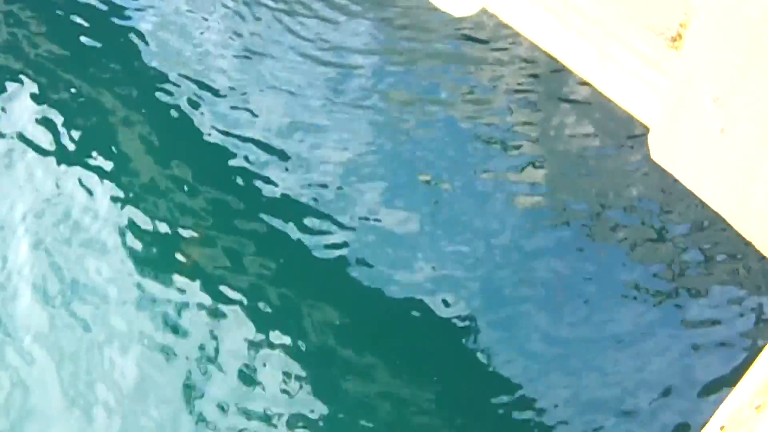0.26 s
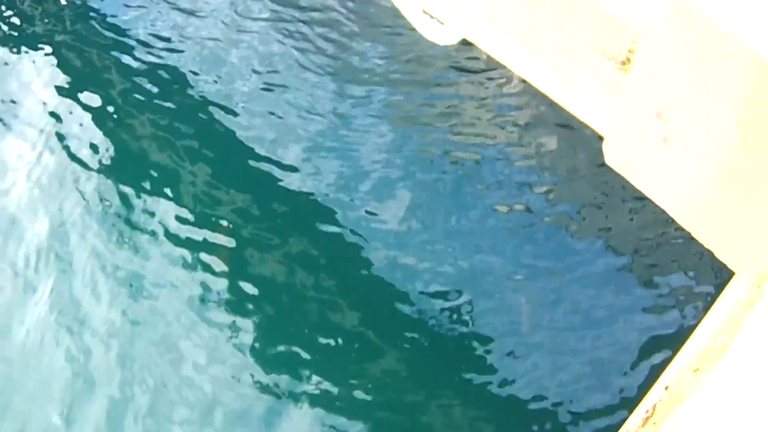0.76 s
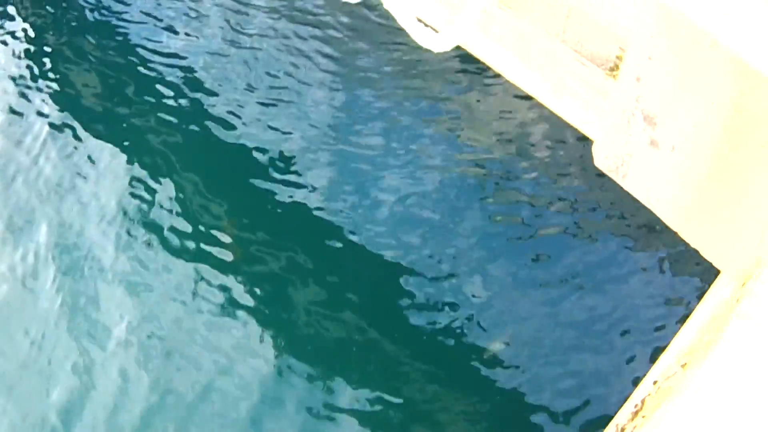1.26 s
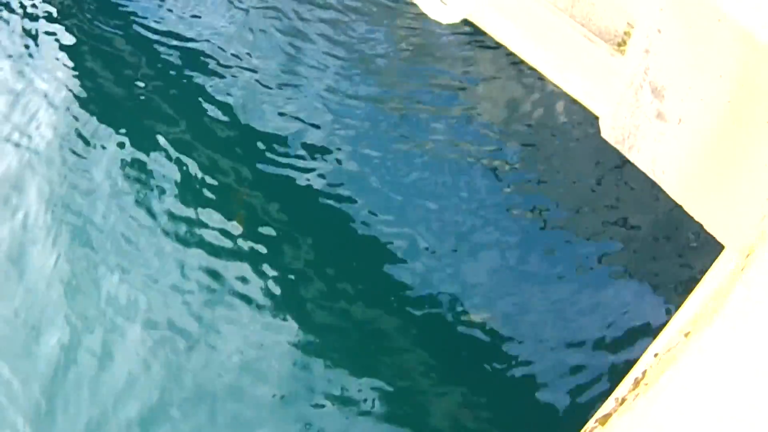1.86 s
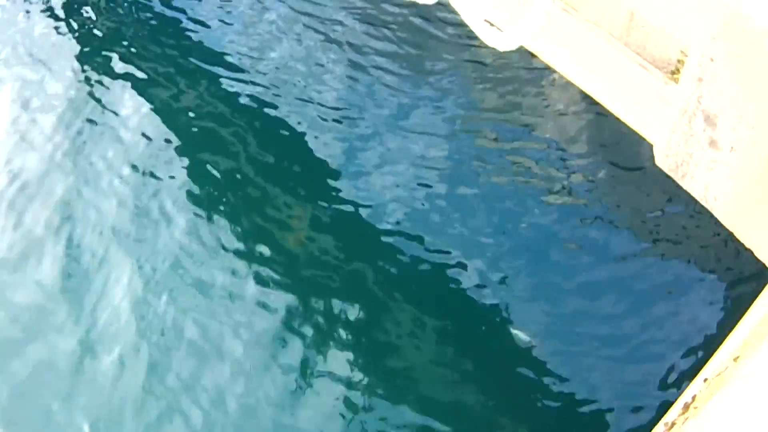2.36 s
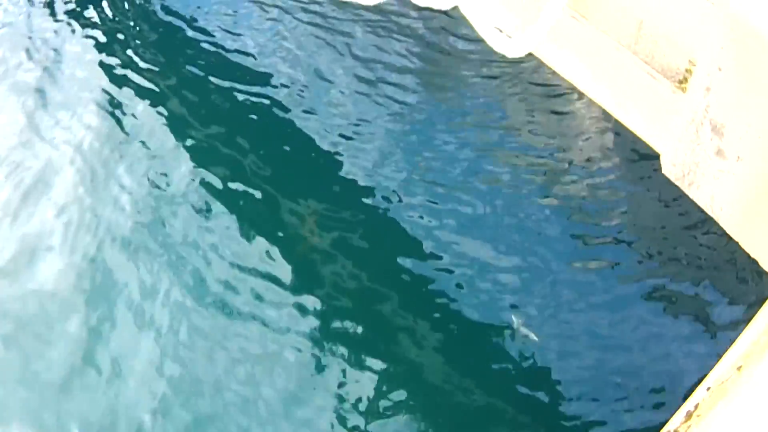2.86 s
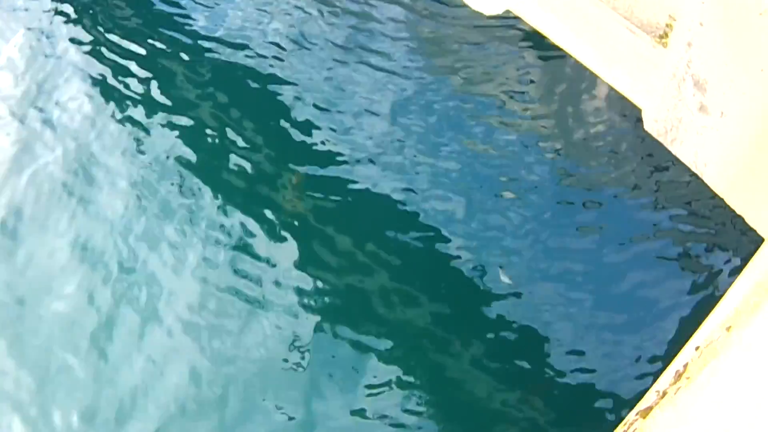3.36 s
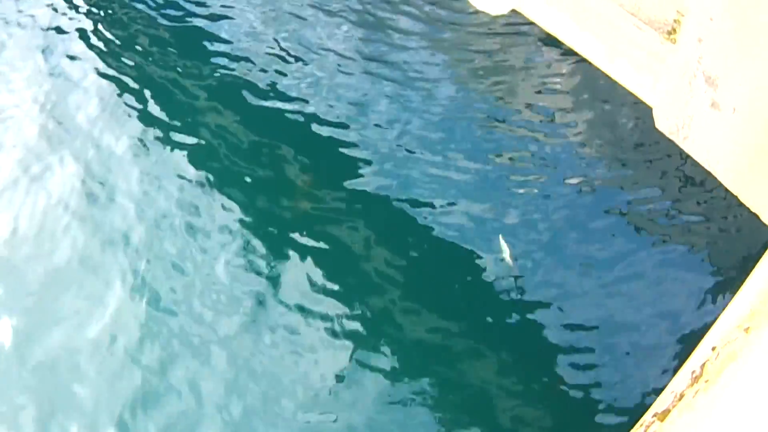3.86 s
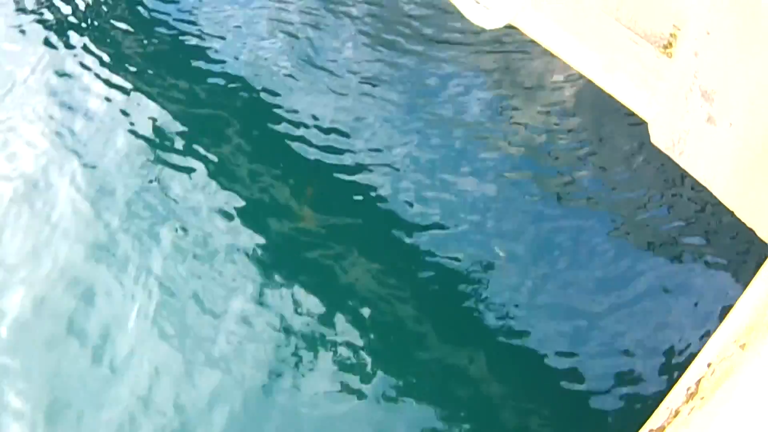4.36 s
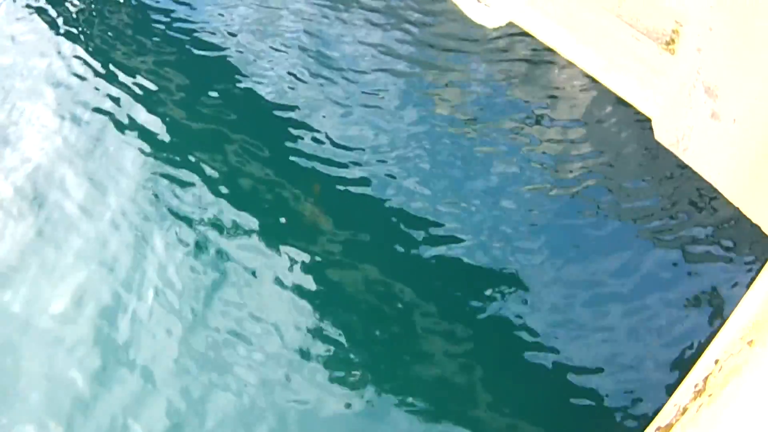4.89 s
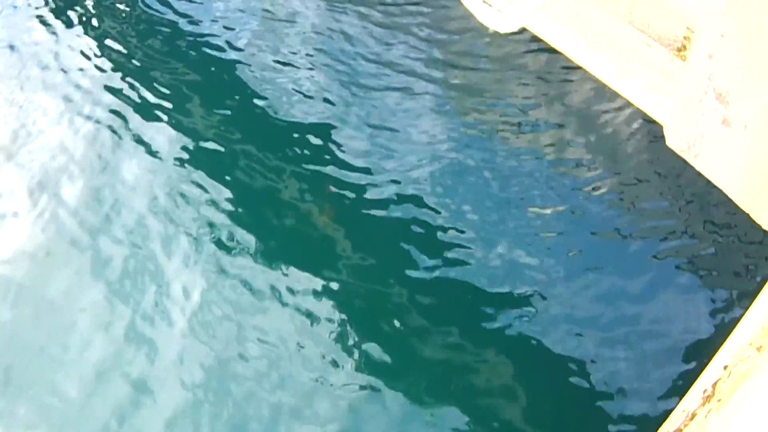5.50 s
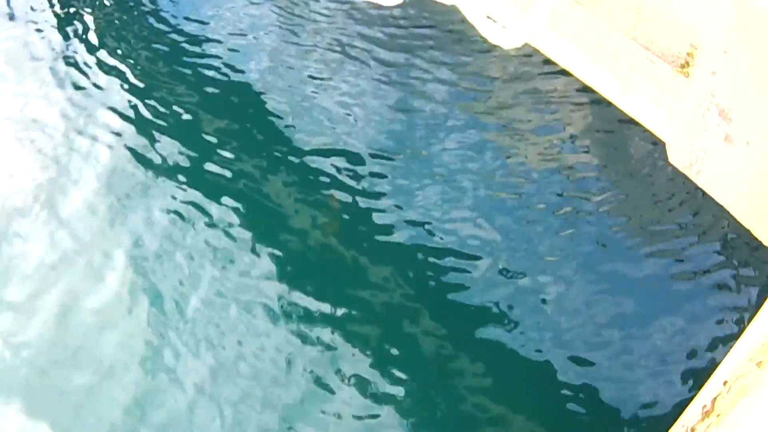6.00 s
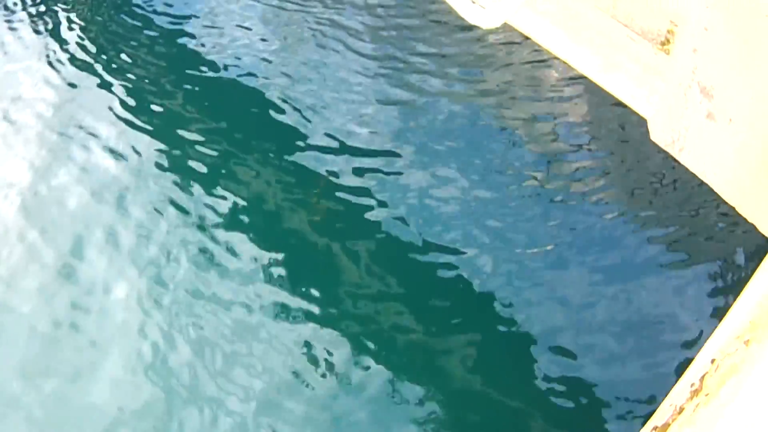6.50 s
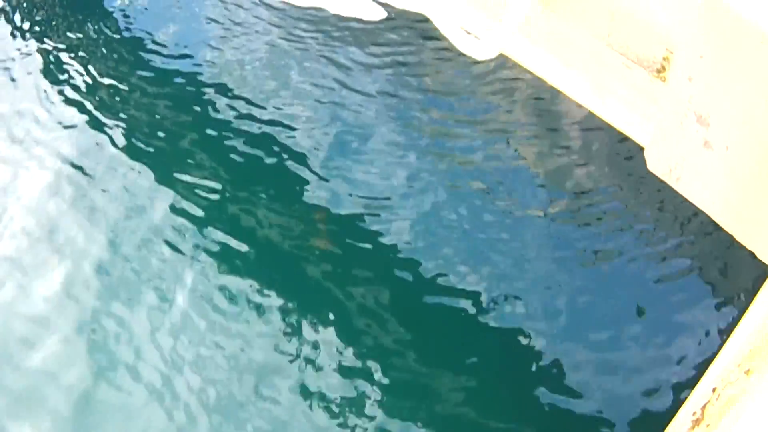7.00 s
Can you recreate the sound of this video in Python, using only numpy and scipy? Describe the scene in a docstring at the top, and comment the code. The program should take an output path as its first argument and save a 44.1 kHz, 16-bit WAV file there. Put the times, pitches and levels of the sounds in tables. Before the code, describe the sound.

A moored boat's diesel engine idles throughout with a low throbbing rumble and light machinery clatter. Over it, water spray hisses steadily, a little to the left, and ripples lap softly against a harbour pier. Small drips plink and a few dry ticks sound, the sharpest about two seconds in. Foam fizzes faintly near the end. The microphone is on the pier, close to the water.

```python
"""A moored boat's diesel idles with a slow throb beside a faster generator, heard from a harbour pier. Their
firings pulse through exhaust and hull, while machinery clatters and whines, and narrow bands of noise swell and
fade. Ripples lap on calm water, and countless droplets of spray merge into a steady hiss off to the left.
Trapped bubbles plink, small contacts make dry ticks, and foam fizzes near the end. It all reaches two close
microphone openings, the bass leaning right and the rest leaning left."""
import sys
import numpy as np
from scipy import signal
from scipy.fft import rfft, irfft, next_fast_len
from scipy.io import wavfile
from scipy.ndimage import uniform_filter1d, map_coordinates

SR = 44100
rng = np.random.default_rng(int(sys.argv[2]) if len(sys.argv) > 2 else 0)


def log_audio(samples):
    """Write samples as a 16-bit WAV file to the path given in sys.argv[1]."""
    # one column per channel
    frames = np.atleast_2d(samples).T
    # limit to full scale, then quantise
    limited = np.clip(frames, -1, 1)
    pcm = np.round(limited * 32767).astype(np.int16)
    wavfile.write(sys.argv[1], SR, pcm)


N = 319435
TIME = np.arange(N) / SR


def amp(db):
    """Turn decibels into a gain to multiply by."""
    return 10 ** (np.asarray(db) / 20)


def unit(x):
    """Scale a signal to an average (rms) level of 1."""
    return x / np.sqrt(np.mean(x ** 2) + 1e-20)


def along(points, hz):
    """Read between (Hz, value) points on a scale of octaves."""
    freqs, values = np.transpose(points)
    return np.interp(np.log(hz + 1), np.log(freqs + 1), values)


def wobble(rate):
    """A smooth curve through `rate` random values a second."""
    return map_coordinates(rng.standard_normal(int(N * rate / SR) + 4), [TIME * rate])


def swell(crest_s, length_s):
    """A smooth rise to 1 and back down."""
    return np.exp(-(2 * (TIME - crest_s) / length_s) ** 2)


def filtered(x, response):
    """Change the level and phase of each frequency by response(hz)."""
    size = next_fast_len(N + SR // 2)
    return irfft(rfft(x, size) * response(np.fft.rfftfreq(size, 1 / SR)), size)[..., :N]


def coloured(x, colour):
    """Give x a tone colour of (Hz, dB) points, fading out above the last, at level 1."""
    top_hz = colour[-1][0]
    return unit(filtered(x, lambda hz: amp(along(colour, hz)) / (1 + (hz / top_hz / 2) ** 2)))


def resonances(modes, hz):
    """The response of something that rings at each (pitch, width, dB)."""
    return sum((-1) ** k * amp(db) * 1j * hz * width / (pitch ** 2 - hz ** 2 + 1j * hz * width)
               for k, (pitch, width, db) in enumerate(modes))


def noise(apart_db):
    """Stereo white noise; higher apart_db makes left and right less alike."""
    mid, side = rng.standard_normal((2, N))
    return unit(np.array([mid + amp(apart_db) * side, mid - amp(apart_db) * side]))


def add(track, start_s, sound):
    """Mix a short sound into a track."""
    part = track[..., round(start_s * SR):][..., :sound.shape[-1]]
    part += sound[..., :part.shape[-1]]


def harmonics(cycles, table, smear):
    """The tones that make up one pulse a cycle; the hull smears the timing of the high ones."""
    return sum(np.sqrt(2) * amp(db) * np.cos(2 * np.pi * k * (cycles + smear * rng.uniform(-0.955, 1)))
               for k, db in table)


DIESEL_CYCLE_HZ, GENERATOR_CYCLE_HZ = 4.629, 9.39
# The strong exhaust tones of each engine. Each row: multiple of its cycle rate, level in dB.
DIESEL_TONES = [(4, -58), (6, -64.5), (7, -56), (9, -51.8), (11, -59), (12, -67), (14, -61.5), (15, -65),
                (16, -56.2), (20, -66), (22, -63.5), (23, -64), (24, -62.5), (25, -61), (27, -56.5),
                (28, -56), (29, -65), (32, -65), (36, -66), (37, -57.5), (38, -66), (39, -63.5), (44, -63),
                (57, -63), (60, -68), (112, -71)]
GENERATOR_TONES = [(2, -58), (4, -58.5), (6, -61), (7, -68), (8, -56), (9, -63), (12, -62), (16, -65)]


def exhausts(cycles):
    """The diesel's exhaust throbs, and the generator beats slowly against it."""
    diesel = harmonics(cycles, DIESEL_TONES, smear=0.012)
    generator_cycles = GENERATOR_CYCLE_HZ * TIME + rng.random() + 0.0058 * wobble(1.59)
    generator = harmonics(generator_cycles, GENERATOR_TONES, smear=0.2)
    return amp(-0.38 + 1.1 * wobble(7)) * (diesel + generator)  # no two firings are equally strong


def knocking(cycles, repeat_share, apart_db):
    """Engine noise: one pattern of knocks returns every cycle, the rest is new each time."""
    pattern = rng.standard_normal(round(SR / DIESEL_CYCLE_HZ))
    repeated = pattern[(cycles % 1 * len(pattern)).astype(int) % len(pattern)]
    return np.sqrt(repeat_share) * repeated + np.sqrt(1 - repeat_share) * noise(apart_db)


# The tone colours of the hull and the engine room. Each row: frequency in Hz, level in dB.
RUMBLE_COLOUR = [(12, -20), (28, -0.5), (58, -2.5), (95, -1.5), (118, 2), (165, -0.5), (193, -3.5),
                 (228, -1.5), (250, -8.5), (300, -2.5), (335, -4.5), (400, -11.5), (800, -38)]
CLATTER_COLOUR = [(250, -43), (440, 0), (500, 0), (585, 2), (720, -6), (950, -3), (1040, -4.5), (1110, -4),
                  (1220, -8), (1390, -5), (1520, -12.5), (3000, -23.5), (8000, -70)]


def rumble_and_clatter(cycles):
    """The hull rumbles and the engine room clatters, a little louder once every crank turn."""
    crank = np.cos(2 * np.pi * 2 * cycles)  # four-stroke: two crank turns a cycle
    rumble_db = -47 + 0.5 * crank + 0.96 * wobble(11)
    rumble = coloured(knocking(cycles, repeat_share=0.14, apart_db=-13.5), RUMBLE_COLOUR)
    clatter = coloured(knocking(cycles, repeat_share=0.17, apart_db=-20), CLATTER_COLOUR)
    return amp(rumble_db) * rumble + amp(-52.5 + 0.15 * crank) * clatter


# The machinery's thin tones. Each row: pitch in Hz, level in dB.
WHINE_TONES = [(586, -78.5), (612, -69), (1103, -71.5)]


def whine():
    """Machinery sings a few faint, slightly wavering tones."""
    return sum(np.sqrt(2) * amp(db) * np.sin(2 * np.pi * hz * TIME + wobble(6))
               for hz, db in WHINE_TONES)


# Swells of narrow noise bands. Each row: loudest moment in seconds, level in dB, length in seconds, # pitch in
# Hz, width of the band in Hz.
BAND_SWELLS = [(.7, -60, 2.5, 960, 150), (.7, -61.5, 1.5, 1407, 160), (2.6, -61.5, 1.8, 1131, 120),
               (2.7, -61, 2.2, 680, 130), (2.9, -65.5, 1.6, 1550, 190), (5.4, -64.5, 4.7, 1283, 90)]


def swelling_bands():
    """Narrow bands of noise swell and fade, each in its own time."""
    track = np.zeros((2, N))
    for crest_s, db, length_s, pitch, width in BAND_SWELLS:
        band = filtered(noise(apart_db=-19), lambda hz: resonances([(pitch, width, 0)], hz) ** 2)
        track += amp(db) * swell(crest_s, length_s) * unit(band)
    return track


def droplets(per_second, spread_db):
    """Tiny impacts at random moments, a few much larger than the rest."""
    size = amp(spread_db * np.minimum(rng.exponential(size=N), 4))
    return unit((rng.random(N) < per_second / SR) * size * rng.choice([-1, 1], N))


def patchy(x, depth_db):
    """Make random patches louder or softer, each some hundred Hz wide and about 0.1 s long."""
    spectra = signal.stft(x, nperseg=512)[2]
    patches = uniform_filter1d(rng.standard_normal(spectra.shape[1:]), size=9, axis=0)
    patches = uniform_filter1d(patches, size=14, axis=1)
    return signal.istft(spectra * amp(depth_db * unit(patches)), nperseg=512)[1][:, :N]


# The tone colours of low wash, bright hiss and fine mist. Each row: frequency in Hz, level in dB.
WASH_COLOUR = [(200, -13), (700, -1), (1100, -4), (1700, -2), (2600, -1), (3500, -2.5), (5000, -5),
               (9000, -36)]
HISS_COLOUR = [(900, -21), (2400, -10.5), (3500, -6), (4900, -1.5), (6000, 1), (7000, -5), (8200, -13),
               (10000, -29), (15000, -67)]
MIST_COLOUR = [(5000, -12), (7000, -0.5), (8300, -1), (10000, -7.5), (12000, -14), (14000, -17),
               (15200, -43)]
# How hard the spray flows. Each row: time in seconds, strength in dB.
SPRAY_FLOW = [(0.0, -48.5), (0.56, -48.5), (0.76, -48.5), (2.26, -48.5), (3.0, -48), (3.41, -48.5),
              (3.85, -45.5), (4.05, -46.5), (4.49, -47.5), (4.75, -47), (5.25, -47), (5.97, -47),
              (7.24, -48.5)]
# Ripples against the pier. Each row: loudest moment in seconds, rise in dB, length in seconds.
RIPPLE_LAPS = [(0.402, 2, 0.28), (1.26, 2.5, 0.39), (1.74, 3.5, 0.097), (2.994, 3, 0.41), (4.8, 1.5, 0.32),
               (5.35, 2, 0.3)]


def ripples_and_spray():
    """Ripples lap in a soft wash; droplets merge into a hiss, with a mist that follows the same flow."""
    flow_db = np.interp(TIME, *np.transpose(SPRAY_FLOW))
    lap_db = sum(db * swell(crest_s, length_s) for crest_s, db, length_s in RIPPLE_LAPS)
    hiss_db = 0.25 + flow_db + 0.26 * lap_db  # each lap lifts the hiss a little too
    mist_db = -60.5 + 0.43 * (hiss_db - hiss_db.mean()) + 0.7 * wobble(22.02)
    flutter_db = 0.39 * wobble(16) + 0.7 * wobble(50)
    patter = amp(-10.5) * droplets(per_second=2000, spread_db=3.5)
    wash = coloured(patchy(noise(apart_db=-15) + patter, depth_db=1), WASH_COLOUR)
    hiss = coloured(patchy(noise(apart_db=-20) + patter, depth_db=0.64), HISS_COLOUR)
    mist = coloured(patchy(noise(apart_db=-20) + patter, depth_db=1), MIST_COLOUR)
    water = amp(-53 + lap_db) * wash + amp(hiss_db + 0.4 * wobble(7.4)) * hiss + amp(mist_db) * mist
    return amp(flutter_db) * water


# Swells of the finest spray. Each row: loudest moment in seconds, level in dB, length in seconds.
SPARKLE_SWELLS = [(1.0, -75, 2.8), (2.58, -74, .45), (3.2, -71.5, .8), (5.95, -68, .14), (6.95, -74, 1.1)]
# Their tone colour. Each row: frequency in Hz, level in dB.
SPARKLE_COLOUR = [(8000, -22), (10500, -1), (13000, 0), (14200, -6), (15200, -39)]


def sparkle():
    """The finest spray brightens the top of the hiss in a few swells."""
    loudness = sum(amp(db) * swell(crest_s, length_s) for crest_s, db, length_s in SPARKLE_SWELLS)
    fine_spray = noise(apart_db=-13) + amp(-8) * droplets(per_second=820, spread_db=6)
    return loudness * amp(1.5 * wobble(8.3)) * coloured(fine_spray, SPARKLE_COLOUR)


def bubble(hz, ring_s):
    """A trapped bubble rings, rising slightly in pitch and fading by 60 dB in ring_s."""
    t = np.arange(SR // 20) / SR
    loudness = amp(-60 * t / ring_s) * (1 - np.exp(-t / 0.00081))
    return loudness / loudness.max() * np.sin(2 * np.pi * hz * t * (1 + 2 * t))


# Drops that trap a bubble. Each row: start in seconds, level in dB, pitch in Hz, ring time in seconds.
BUBBLE_DROPS = [(0.124, -39, 3120, .014), (0.3835, -33, 3700, .009), (0.739, -35.5, 3520, .013),
                (1.115, -43, 2670, .018), (1.261, -43, 2700, .018), (1.289, -43, 2600, .02),
                (1.379, -41, 2990, .018), (2.694, -50, 2270, .016), (3.930, -44, 2200, .027),
                (3.954, -45, 2660, .03), (4.825, -47, 2540, .018), (5.922, -39, 2960, .016),
                (6.383, -39, 2740, 0.018), (6.393, -45, 2820, .018), (6.407, -38.5, 2630, .016),
                (6.413, -45, 2930, .018), (6.423, -45, 2860, .025), (6.439, -46, 2520, .025)]


def plinks():
    """A few clear drops, each with a small splash, among many faint bubbles."""
    track = np.zeros(N)
    for start_s, db, hz, ring_s in BUBBLE_DROPS:
        ring = bubble(hz, ring_s)
        burst = rng.standard_normal(len(ring)) * np.abs(ring)
        splash = signal.fftconvolve(burst, bubble(hz, ring_s=0.0014))[:len(ring)]
        add(track, start_s, amp(db) * (ring + amp(-5) * splash / np.abs(splash).max()))
    for when, pitch, strength in rng.random(size=(300, 3)):  # the faint bubbles
        hz = 5700 * np.exp(0.5 * (pitch - 0.5))
        add(track, when * N / SR, amp(-47 + 5.5 * strength ** 3) * bubble(hz, ring_s=0.0058))
    return track


# Dry ticks. Each row: start in seconds, peak in dB, knock pitch in Hz, dB of knock over snap,
# crackle time in seconds, treble limit in Hz, dB of left over right.
DRY_TICKS = [(0.3835, -20.5, 2010, 4.5, 0.009, 6500, -.5), (0.74, -25, 4400, -11, 0.008, 9500, 0),
             (0.8557, -28, 2800, 9, .005, 5000, 1), (0.871, -26.5, 2030, 13, 0.0072, 5000, 0),
             (2.2441, -16, 1530, -3, 0.011, 17000, 2), (2.695, -26, 2420, -5, .005, 15000, 5),
             (5.215, -29, 5900, 2, 0.007, 8000, 0), (5.923, -29, 2100, 3, .008, 13000, 2),
             (6.3125, -33, 3570, 0, .008, 8000, 0)]
# A tick's low knock. Each row: pitch and width as multiples of the knock pitch, level in dB.
KNOCK_RINGS = [(.66, 0.3, -2), (1, 0.27, 4), (1.65, 0.28, 2.5)]
# A tick's bright snap. Each row: pitch in Hz, width in Hz, level in dB.
SNAP_RINGS = [(3560, 1500, -4), (5100, 1600, 1), (6400, 1260, 2), (8100, 1500, -5), (10600, 2300, -12),
              (15300, 2000, -20)]


def ticks():
    """Small contacts: a sharp blow and a crackle ring very briefly; softer contacts are duller."""
    track, t = np.zeros((2, N)), np.arange(2048) / SR
    hz = np.fft.rfftfreq(len(t), 1 / SR)
    for start_s, db, knock_hz, knock_db, crackle_s, limit_hz, left_db in DRY_TICKS:
        blow = (t == 0) + 0.089 * rng.standard_normal(len(t)) * amp(-60 * t / crackle_s)
        dulling = 1 / (1 + np.sqrt(2) * 1j * hz / limit_hz - (hz / limit_hz) ** 2)
        ringing = resonances(SNAP_RINGS, hz) - amp(knock_db) * resonances(KNOCK_RINGS, hz / knock_hz)
        tick = irfft(rfft(blow) * dulling * ringing)
        pan = amp([[left_db / 2], [-left_db / 2]])
        add(track, start_s, amp(db) * tick / np.abs(tick).max() * pan)
    return track


# Clumps of spray. Each row: loudest moment in seconds, level in dB, length in seconds.
SPATTER_CLUMPS = [(0.42, -51, .08), (1.002, -47, .016), (1.994, -45.5, .014), (2.627, -43, .012),
                  (2.689, -47, .012), (3.658, -45.5, .016), (4.185, -47, .022), (4.706, -45, .012),
                  (5.1, -44.5, .01), (5.176, -45.5, 0.015), (5.683, -43, .012), (5.884, -44, .012),
                  (6.402, -45, 0.043), (6.62, -47, 0.038)]
# Their tone colour. Each row: frequency in Hz, level in dB.
SPATTER_COLOUR = [(3000, -23), (4900, -0.5), (5950, 2.5), (7300, -8), (8500, -9), (11000, -31),
                  (14000, -50)]


def spatters():
    """Clumps of droplets land together: brief puffs in the hiss, with no pitch."""
    loudness = sum(amp(db) * swell(crest_s, length_s) for crest_s, db, length_s in SPATTER_CLUMPS)
    patter = noise(apart_db=-20) + amp(-10) * droplets(per_second=1700, spread_db=5)
    return loudness * coloured(patter, SPATTER_COLOUR)


# Bursts of foam. Each row: start in seconds, end in seconds, level in dB.
FOAM_BURSTS = [(6.02, 6.68, -56.5), (6.9, 7.0, -52)]
# Their tone colour. Each row: frequency in Hz, level in dB.
FOAM_COLOUR = [(4000, -14), (7000, 0.5), (8500, -2), (10000, -11), (12000, -41)]


def foam_fizz(fade_s=0.038):
    """Foam fizzes up: a quick rise, a hold and a quick fall."""
    loudness = sum(amp(db) * np.clip(np.minimum(TIME - start_s, end_s - TIME) / fade_s, 0, 1)
                   for start_s, end_s, db in FOAM_BURSTS)
    foam = noise(apart_db=-15) + amp(-3) * droplets(per_second=1100, spread_db=8)
    return amp(1.6 * wobble(42)) * loudness * coloured(foam, FOAM_COLOUR)


# Which side is louder. Each row: frequency in Hz, dB of left over right.
LEFT_LOUDER = [(60, -4.0), (110, -2.5), (200, -1), (380, 6.5), (700, 9), (1290, 7.0), (2380, 6.0),
               (4400, 6), (8120, 5), (15000, -1.5)]
# Which side is earlier. Each row: frequency in Hz, the left side's lead in radians.
LEFT_EARLIER = [(25, 0.14), (70, 0.37), (140, 0.67), (320, 0.93), (780, 0.3), (1120, 0), (16000, 0.11)]


def microphone_openings(sound):
    """The two openings differ in level and timing, differently at each frequency."""
    def response(hz):
        left = amp(along(LEFT_LOUDER, hz) / 2) * np.exp(1j * along(LEFT_EARLIER, hz) / 2)
        pair = np.array([left, 1 / left])
        return pair / np.abs(pair.mean(axis=0))
    return filtered(sound, response)


def scene():
    """Engines, water and ticks all reach the same two openings."""
    first_throb_s = 0.084
    cycles = DIESEL_CYCLE_HZ * (TIME - first_throb_s) + 0.0018 * wobble(1.52)  # a slightly uneven idle
    boat = exhausts(cycles) + rumble_and_clatter(cycles) + whine() + swelling_bands()
    water = ripples_and_spray() + sparkle()
    brief_sounds = plinks() + ticks() + spatters() + foam_fizz()
    return microphone_openings(boat + water + brief_sounds)


# The tone colour of the microphones' own hiss. Each row: frequency in Hz, level in dB.
MIC_HISS_COLOUR = [(100, -4), (13500, 3), (15200, -25)]


def record(dry):
    """The microphones add a faint hiss; the highest treble is cut, and each side rests a bit off zero."""
    top_hz, left_offset, right_offset = 16300, 0.0037, 0.0707
    hissy = dry + amp(-74) * coloured(noise(apart_db=3), MIC_HISS_COLOUR)
    return filtered(hissy, lambda hz: hz < top_hz) + np.array([[left_offset], [right_offset]])


dry = scene()
out = record(dry)
log_audio(out)
```